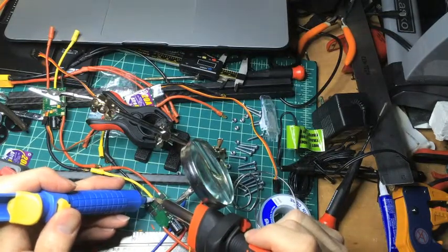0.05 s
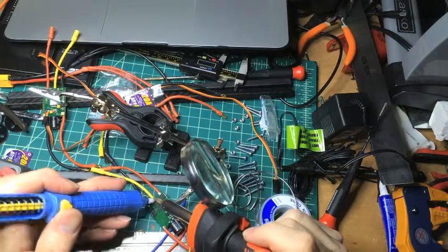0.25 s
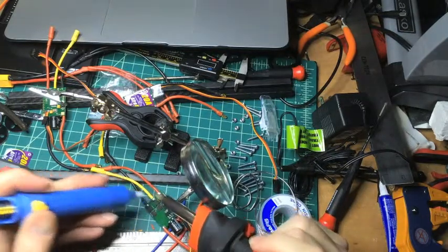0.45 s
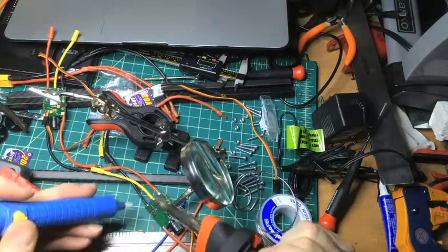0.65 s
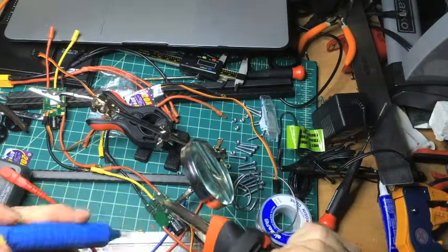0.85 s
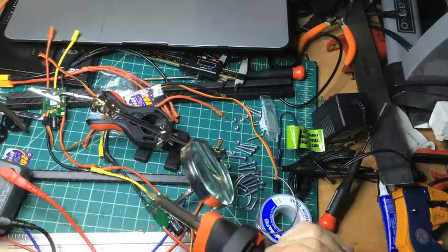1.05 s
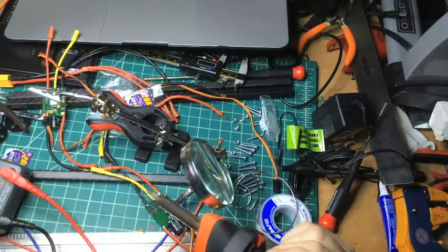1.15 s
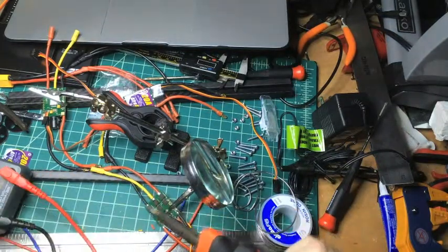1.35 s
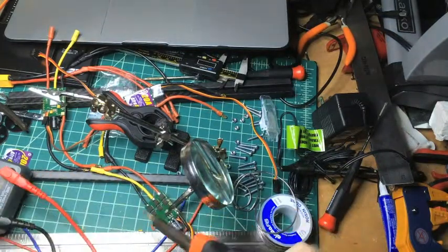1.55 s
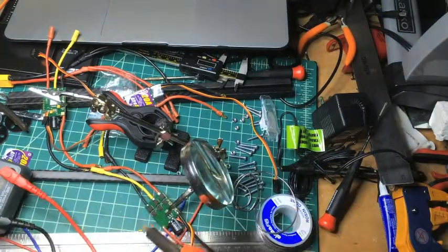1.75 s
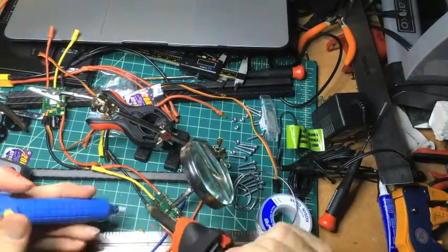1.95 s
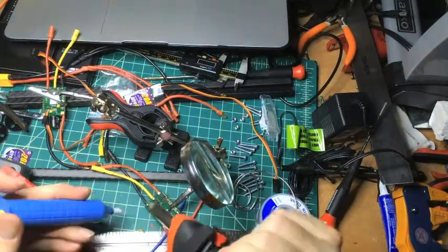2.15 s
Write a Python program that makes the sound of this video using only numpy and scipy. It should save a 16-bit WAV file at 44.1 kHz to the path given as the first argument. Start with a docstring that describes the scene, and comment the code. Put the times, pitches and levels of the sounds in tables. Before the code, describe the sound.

A desoldering pump fires once at an electronics bench, a close, sharp plastic snap with a thump and a brief metallic spring ring. Faint soldering iron scratches and a soft hand slide follow over a low room hum.

```python
"""A spring-loaded desoldering pump fires at an electronics bench, over a low hum.
Its catch clicks, and the piston gulps air, slams into its stop and chatters. The steel spring rings
on while automatic gain control turns the hum down. The pump is lifted away with a soft knock.
Then the soldering iron scratches at the joint, flux sizzles and a hand slides over the bench."""
import sys
import numpy as np
from scipy import signal
from scipy.fft import rfft, irfft
from scipy.io import wavfile
from scipy.ndimage import uniform_filter1d, minimum_filter1d

SR = 44100
rng = np.random.default_rng(int(sys.argv[2]) if len(sys.argv) > 2 else 0)


def generate_wav(signal):
    """Clip the signal to [-1, 1] and save it as 16-bit WAV at the path in sys.argv[1]."""
    frames = np.transpose(np.atleast_2d(signal))
    scaled = np.clip(frames, -1, 1) * 32767
    pcm = np.round(scaled).astype(np.int16)
    wavfile.write(sys.argv[1], SR, pcm)


N = 97020

TOP_HZ = 15300
HIT_RISE_S, THUMP_S = .00023, .2301
# tone of the pump's plastic barrel (frequency [Hz], relative level [dB])
BARREL_TONE = [(150, -4.5), (450, 0), (1000, -14), (1700, -4.5), (2350, -1.5), (2700, -9), (3100, 5),
               (4200, -6), (5800, 1), (8000, 0), (11000, 0.5), (15000, -2.5)]


def amp(db):
    """Turns decibels into a gain."""
    return 10 ** (np.asarray(db) / 20)


def unit(x):
    """Scales a signal to an average (rms) level of 1."""
    return x / np.sqrt(np.mean(x ** 2) + 1e-20)


def look_up(table, hz):
    """Reads between a table's rows on a log-frequency scale."""
    f, value = np.transpose(table)
    return np.interp(np.log(hz + 1), np.log(f + 1), value)


def noise(tone, tilt_db=0):
    """Noise with a given tone, tilted per octave below 6000 Hz: a positive tilt sounds thinner."""
    hz = np.fft.rfftfreq(N, 1 / SR)
    db = look_up(tone, hz) + tilt_db * np.log2(np.clip(hz, 1, 6000) / 6000)
    return unit(irfft(rfft(rng.standard_normal(N)) * amp(db) * (hz < TOP_HZ), N))


def wander(seconds):
    """A smooth random wobble; more seconds make it slower."""
    hz = np.fft.rfftfreq(N, 1 / SR)
    smoothing = np.exp(-(hz * seconds) ** 2) * (hz > 0)
    return unit(irfft(rfft(rng.standard_normal(N)) * smoothing, N))


def since(start):
    """Seconds since a moment, zero before it."""
    return np.maximum(np.arange(N) / SR - start, 0)


def ring(start, rise, fade, hold=0):
    """A level that rises and dies away; a fade time is the seconds it takes to drop 60 dB."""
    return np.minimum(since(start) / rise, 1) * amp(-60 * since(start + hold) / fade)


def bump(at, width):
    """A bell-shaped swell, timed in seconds."""
    return np.exp(-.5 * ((np.arange(N) / SR - at) / width) ** 2)


def band(hz, width_hz):
    """Noise gathered around one pitch."""
    return unit(wander(1 / width_hz) * np.sin(2 * np.pi * hz * since(0)))


def room_hum():
    """Low, wavering tones over the dull hiss of room air."""
    # tones of the hum (frequency [Hz], level [dB])
    hum_tones = [(59.2, -55), (126, -63), (204.6, -60), (237, -62.5)]
    # room air (frequency [Hz], relative level [dB])
    air_tone = [(20, -44), (32, -21.5), (48, -8), (75, -7.5), (110, -5), (170, -7.5), (215, -4), (300, -14),
                (420, -12.5), (700, -19), (1000, -22.5), (1400, -26), (2200, -32.5), (3100, -39),
                (6000, -43.5), (9000, -46), (15000, -48)]
    waver, waver_s = .29, .07
    hum = 0
    for hz, db in hum_tones:
        swell = 1 + waver * wander(waver_s)
        phase = 2 * np.pi * (hz * since(0) + rng.random()) + waver * wander(waver_s)
        hum += amp(db) * unit(swell * np.sin(phase))
    return hum + amp(-53) * noise(air_tone)


def catch():
    """The catch lets go, and tiny contacts click through the barrel."""
    # catch and piston contacts (time [s], level [dB], fade time [s])
    clicks = [(.2062, -43, .014), (.2098, -48.5, .010), (.218, -50, .012), (.2252, -48.5, .02)]
    level = sum(amp(db) * ring(at, HIT_RISE_S, fade) for at, db, fade in clicks)
    return level * noise(BARREL_TONE, tilt_db=-1)


def spring_ring(start, tilt_db=0):
    """One knock on the spring: a shimmer of crowded, beating tones, with a few standing out."""
    # the shimmer's tone (frequency [Hz], relative level [dB])
    shimmer_tone = [(300, -10.5), (1100, -6), (1800, -8.5), (2600, -4), (2900, 0), (3170, 6.5), (3550, -4),
                    (4300, -7.5), (5200, 1), (5750, 4), (6500, -1), (7300, 0.5), (8300, -4.5), (10500, 0),
                    (15000, -7)]
    # how long the shimmer rings (frequency [Hz], fade time [s])
    fade_times = [(300, .3), (1500, 0.34), (3100, 0.58), (6000, .6), (9000, .5), (15000, .39)]
    # the spring's strongest tones (frequency [Hz], level [dB], fade time [s])
    clear_tones = [(3085, -40.5, .45), (3067, -32.5, .45), (3359, -37.5, .42), (5620, -30, .42),
                   (5750, -38, .42), (6708, -37, .4), (8700, -39, .4), (9683, -32, .36), (10209, -36, 0.28),
                   (10800, -36, .36), (11289, -34.5, .36), (12589, -38, .33)]

    def treble_gain(f):
        return amp(tilt_db * np.log2(np.maximum(f / 3200, 1)))

    # split noise into a grid of pitch and time, so each pitch can fade at its own pace
    hz, t, grid = signal.stft(noise(shimmer_tone), SR, nperseg=256)
    hz, age = hz[:, None], np.maximum(t - start, 0)
    beats = uniform_filter1d(rng.standard_normal(grid.shape), size=12, axis=1)
    beats = unit(uniform_filter1d(beats, size=2, axis=0))
    main_fade = amp(-60 * age / look_up(fade_times, hz))
    faint_tail = amp(-35.5 - 60 * age / 2.4) / (1 + (hz / 8030) ** 8)
    grid *= amp(2.5 * beats) * (main_fade + faint_tail) * treble_gain(hz)
    shimmer = signal.istft(grid, SR, nperseg=256)[1][:N]
    flutter = amp(.5 * wander(.002))
    rise = np.minimum(since(start) / .0033, 1)
    sound = amp(-19) * shimmer * flutter * rise
    for f, db, fade in clear_tones:
        tone = np.sin(2 * np.pi * (f * since(start) + rng.random()))
        sound += amp(db) * treble_gain(f) * ring(start, HIT_RISE_S, fade) * tone
    return sound


def spring():
    """The piston's first blow sets the spring ringing; duller jolts come before and after."""
    # light jolts (time [s], level against the main ring [dB], treble tilt [dB per octave])
    jolts = [(.209, -25, -13.5), (0.527, -26.5, -6)]
    return spring_ring(start=.229) + sum(amp(db) * spring_ring(at, tilt) for at, db, tilt in jolts)


def air_pulse():
    """The piston sucks air as it flies and rebounds, and pushes air as it stops."""
    # gulps of suction (time [s], level [dB], width [s])
    gulps = [(0.221, -22, .0018), (.234, -18, 0.0022)]
    suction = sum(amp(db) * bump(at, width) for at, db, width in gulps)
    push = amp(-6.5) * bump(THUMP_S, width=.0013)
    bass_cut = signal.butter(1, 46.7, "high", fs=SR)
    return signal.lfilter(*bass_cut, push - suction)


def piston():
    """The piston cracks against its stop and bounces, shaking the barrel each time."""
    # blows on the stop (time [s], level [dB], fade time [s], tilt [dB per octave])
    blows = [(0.2286, -4, 0.015, -0.5), (0.2299, 2.5, 0.012, 0), (0.2322, -9, 0.025, -1),
             (0.2373, -13, .025, 4.5), (0.2404, 0.5, 0.0062, 5), (0.2428, -8, 0.036, 4.5),
             (0.2478, -8, 0.029, 4)]
    return sum(amp(db) * ring(at, HIT_RISE_S, fade) * noise(BARREL_TONE, tilt)
               for at, db, fade, tilt in blows)


def room_boom():
    """The room answers the snap with a short, low boom."""
    # the boom's tone (frequency [Hz], relative level [dB])
    boom_tone = [(25, -20), (60, 0), (130, -4), (260, -14.5), (600, -16.5), (1200, -20), (3000, -40)]
    return amp(-31.5) * ring(THUMP_S, rise=.01, fade=.3) * noise(boom_tone)


def bench_knock():
    """A soft knock on the bench as the pump is lifted away."""
    return amp(-47) * ring(start=.414, rise=.006, fade=.12) * band(hz=770, width_hz=160)


def iron_scratches():
    """The iron's tip scrapes the joint in short, gritty strokes, and squeaks once."""
    # strokes of the tip (middle time [s], width [s], level [dB])
    strokes = [(.977, 0.0083, -59.5), (0.99, 0.0019, -53.5), (1.004, 0.0073, -53), (1.023, 0.0074, -55),
               (1.042, 0.0084, -61), (1.124, 0.0021, -62), (1.164, 0.013, -60.5), (1.174, 0.0056, -65.5),
               (1.404, 0.016, -71), (1.608, 0.0085, -67.5)]
    # the scraping's tone (frequency [Hz], relative level [dB])
    scrape_tone = [(1000, 1.5), (2700, -4.5), (4100, 3), (4700, -1.5), (5400, -9), (6400, -3.5), (8200, -4),
                   (9500, -2.5), (10300, -3), (12800, -2), (15000, -4)]
    level = sum(amp(db) * bump(at, width) for at, width, db in strokes)
    grit = unit(noise(scrape_tone) * amp(2.5 * wander(.0031)))
    squeak = amp(-50.5) * bump(at=1.024, width=.0056) * band(hz=5340, width_hz=420)
    return level * grit + squeak


def flux_sizzle():
    """Flux, the cleaning agent in solder, sizzles thinly on the hot iron."""
    # the sizzle's tone (frequency [Hz], relative level [dB])
    sizzle_tone = [(3000, -28), (6300, -17), (7200, 1), (8200, -9), (9100, -5), (9500, 1), (10000, -18),
                   (15000, -20)]
    return amp(-76.5) * bump(at=1.87, width=.1) * noise(sizzle_tone)


def hand_slide():
    """A hand rubs over the bench, fading as it slows to rest."""
    # the rubbing's tone (frequency [Hz], relative level [dB])
    rub_tone = [(1000, -41), (2000, -14), (2450, 5.5), (2620, -5), (2820, 6.5), (3100, -2), (4100, 1.5),
                (5200, -8), (7800, -5.5), (9000, -20), (15000, -19)]
    return amp(-61.5) * ring(start=1.921, rise=.0026, fade=.75, hold=.091) * noise(rub_tone)


def scene():
    """Everything at the bench, added into one channel."""
    sound = room_hum() + catch() + spring() + air_pulse() + piston() + room_boom()
    sound += bench_knock() + iron_scratches() + flux_sizzle() + hand_slide()
    return sound[None]


def record(dry):
    """Gain control dips fast, holds and recovers slowly; peaks are rounded and the top treble is cut."""
    limit_db, duck_share, hold_s, recover_db_per_s = -24, .5, .2, 37
    ceiling = .66
    level_db = 10 * np.log10(abs(uniform_filter1d(dry[0] ** 2, size=400)) + 1e-12)
    cut_db = np.maximum(level_db - limit_db, 0) * duck_share
    hold = 2 * int(hold_s * SR / 2) + 1
    # keep the deepest recent cut, then let it go at a steady rate
    held_db = -minimum_filter1d(-cut_db, hold, origin=hold // 2, mode="constant")
    recovery_db = since(0) * recover_db_per_s
    duck_db = np.maximum.accumulate(held_db + recovery_db) - recovery_db
    gain = amp(-uniform_filter1d(duck_db, size=64))
    rounded = ceiling * np.tanh(dry * gain / ceiling)
    treble_cut = signal.firwin(511, TOP_HZ, window=("kaiser", 9), fs=SR)
    return signal.oaconvolve(rounded, treble_cut[None], "same")


dry = scene()
out = record(dry)
generate_wav(out)
```